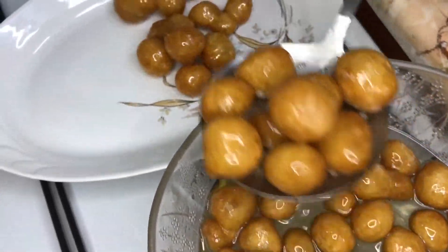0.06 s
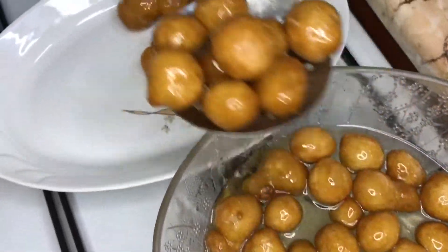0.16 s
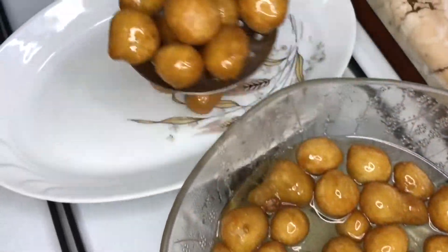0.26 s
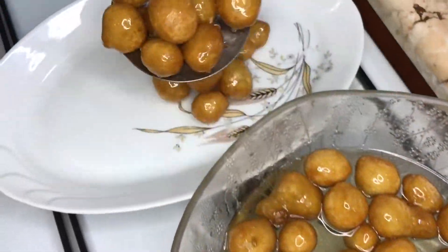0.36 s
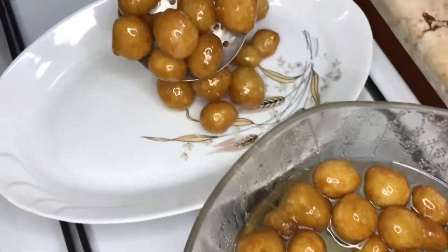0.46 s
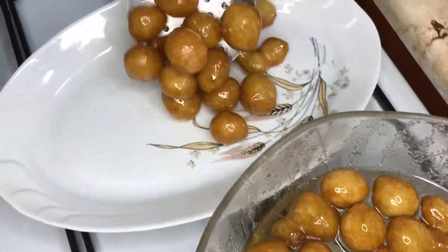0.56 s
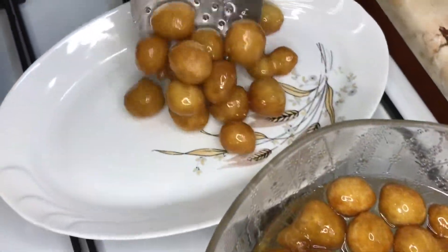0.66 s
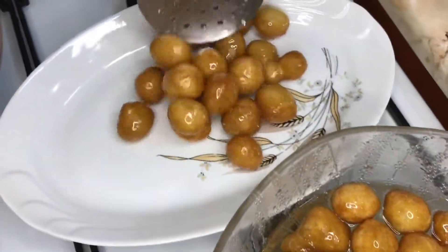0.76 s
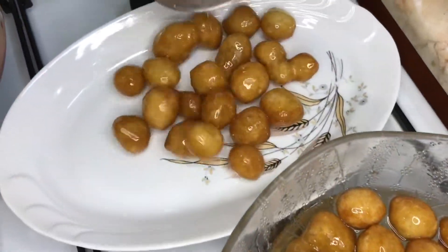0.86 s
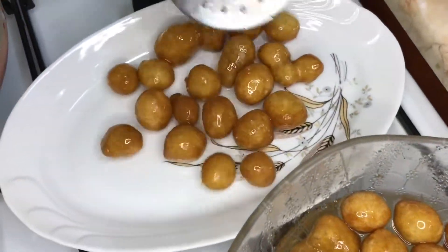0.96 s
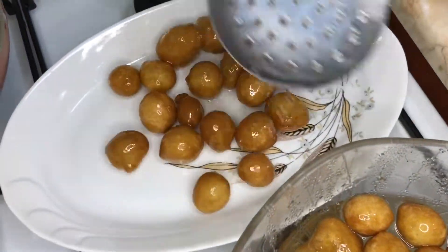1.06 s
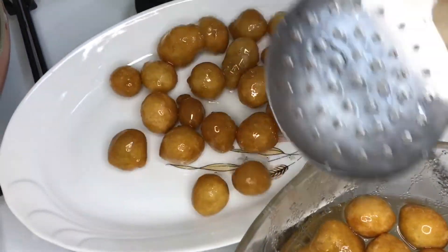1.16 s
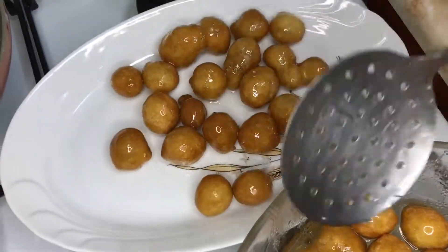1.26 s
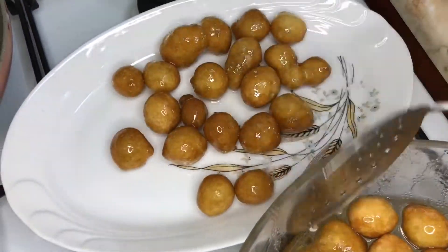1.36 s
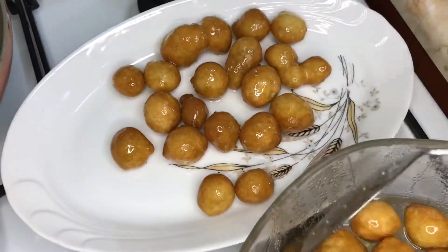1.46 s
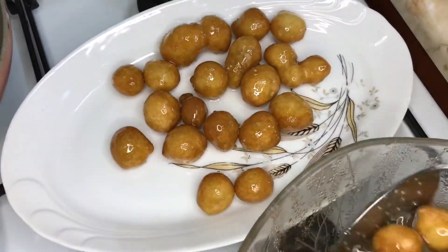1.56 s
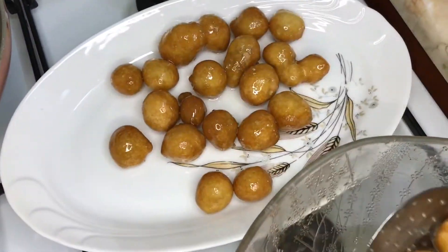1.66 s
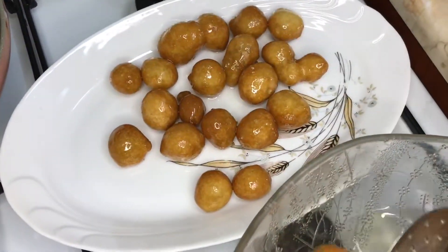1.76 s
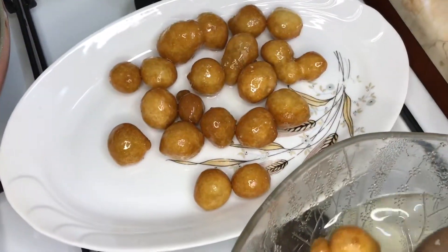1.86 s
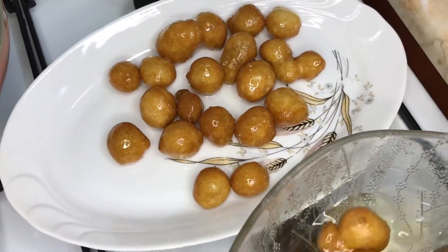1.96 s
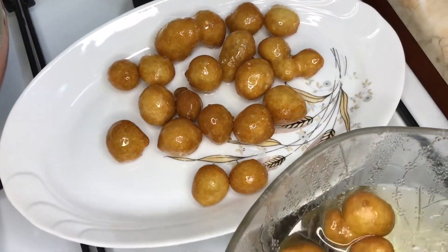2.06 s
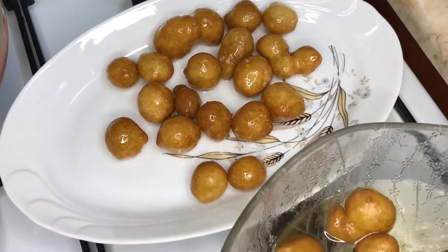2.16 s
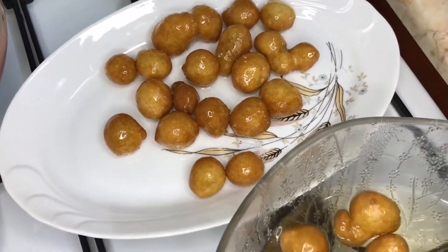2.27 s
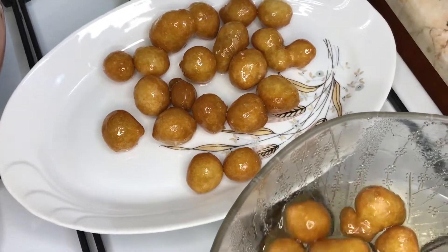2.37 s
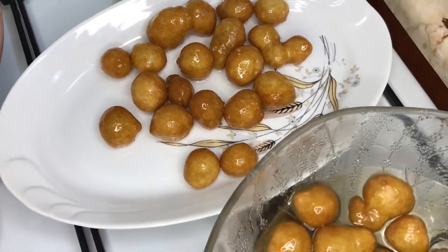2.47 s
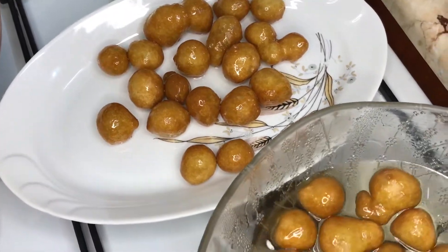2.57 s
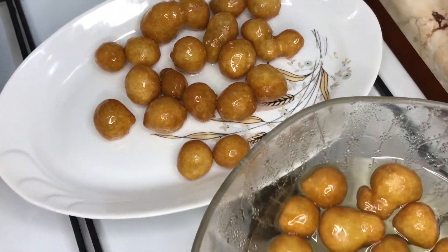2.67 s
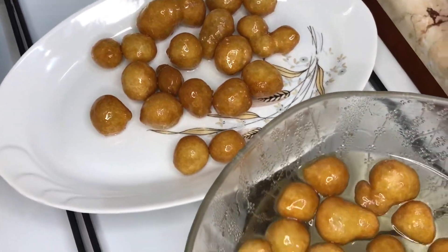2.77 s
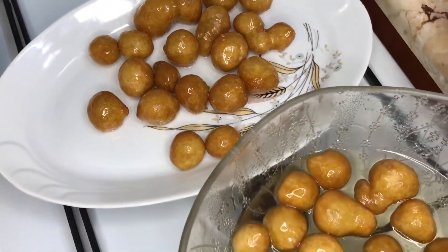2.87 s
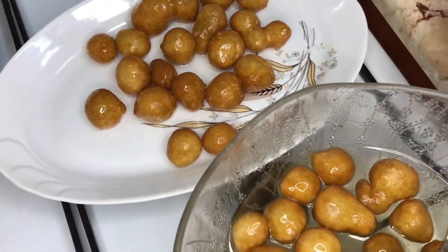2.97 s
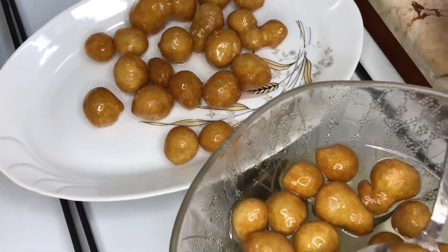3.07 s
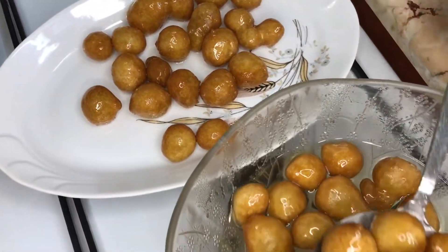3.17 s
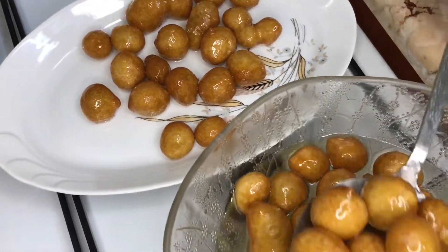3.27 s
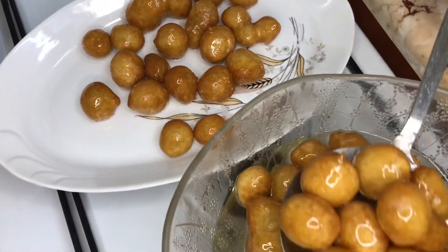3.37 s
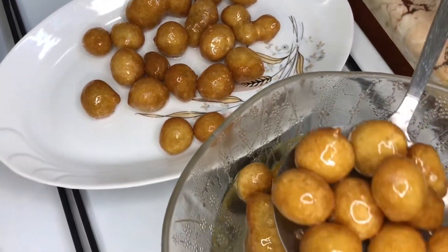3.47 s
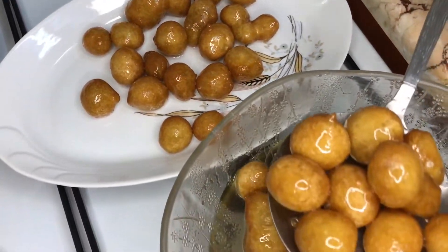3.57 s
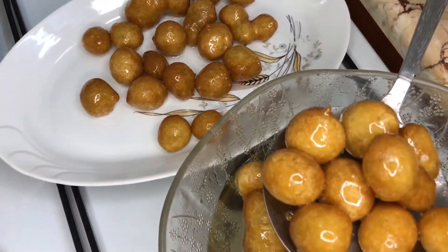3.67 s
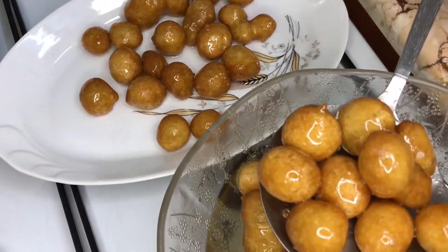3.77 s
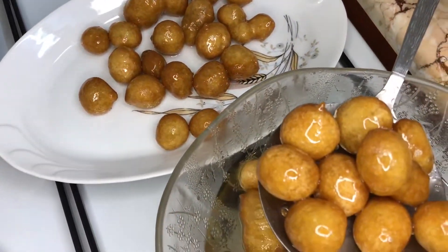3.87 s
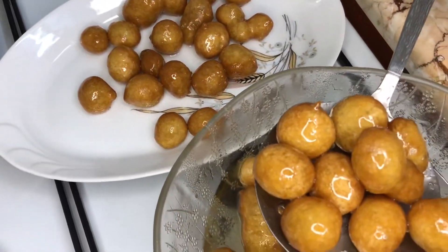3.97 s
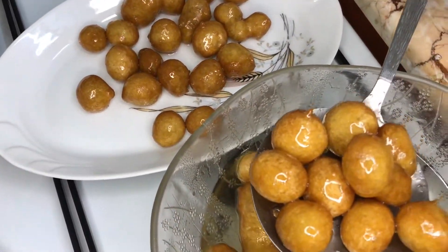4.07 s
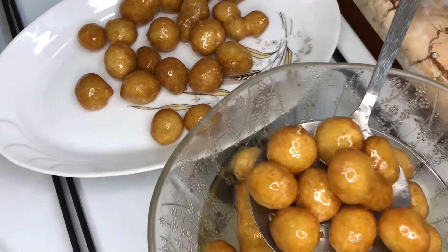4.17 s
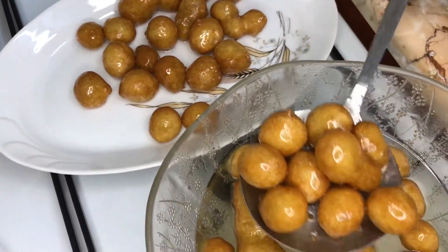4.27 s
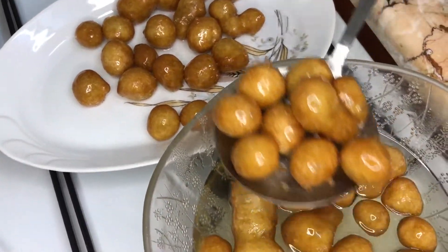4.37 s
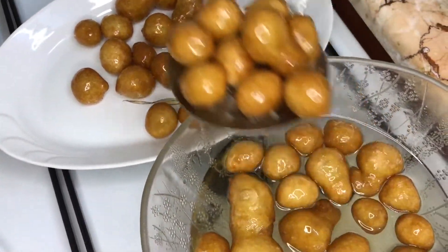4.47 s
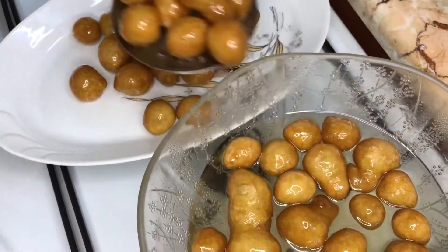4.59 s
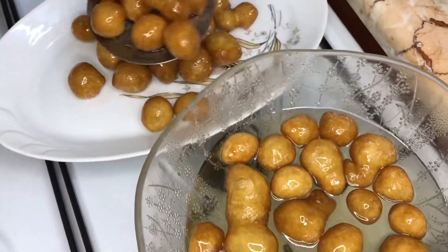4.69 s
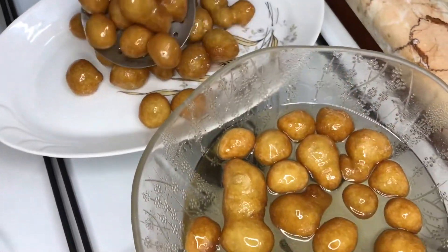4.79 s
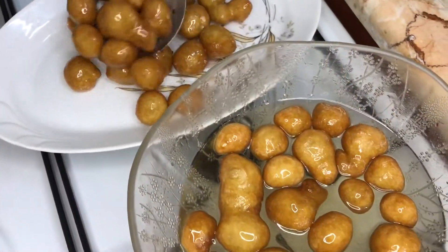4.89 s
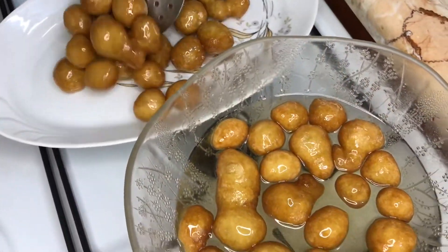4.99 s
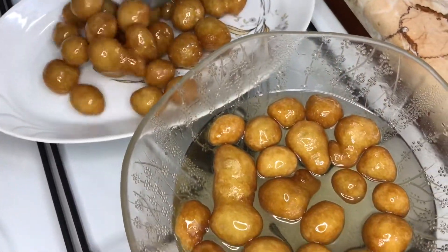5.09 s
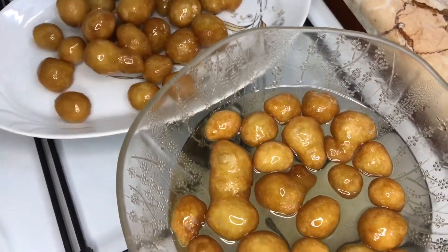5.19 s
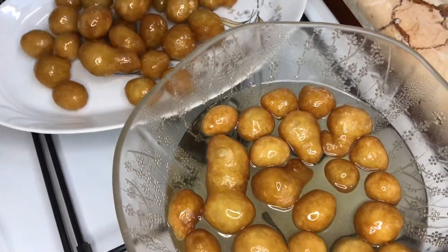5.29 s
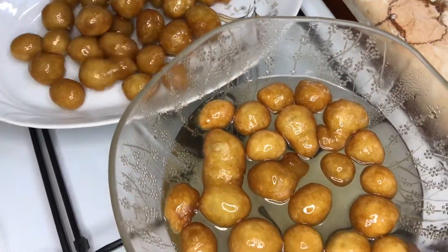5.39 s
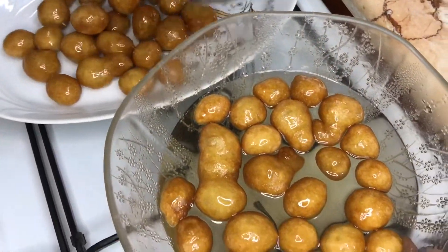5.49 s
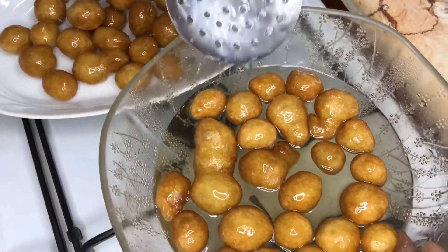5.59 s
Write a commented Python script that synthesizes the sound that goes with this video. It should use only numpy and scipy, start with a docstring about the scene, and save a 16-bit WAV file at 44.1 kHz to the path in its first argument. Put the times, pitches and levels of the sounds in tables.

```python
"""Dough balls, skimmer and plate

A steel skimmer lifts syrupy dough balls out of a glass bowl and tips them on a porcelain plate in a quiet kitchen.
Blows are decaying sines plus a noise crack; the scrape drives the bowl's resonances with dense random slips.
Rolling balls are uneven bumps through plate resonances; squeals and a low thud are narrow noise around a tone;
short bright ticks are sticky clicks or the treble of a knock. Under it lie a household rumble and a faint hiss."""
import sys
import numpy as np
from scipy import signal
from scipy.fft import rfft, irfft
from scipy.io import wavfile

SR = 44100
rng = np.random.default_rng(int(sys.argv[2]) if len(sys.argv) > 2 else 0)


def store_wav(level_fs):
    """Save 16-bit WAV to argv[1]."""
    pcm = np.round(np.clip(np.atleast_2d(level_fs), -1, 1) * 32767)
    wavfile.write(sys.argv[1], SR, pcm.T.astype(np.int16))


N = 248677   # length in samples


def from_db(db):
    """Decibels to an amplitude factor."""
    return 10 ** (np.asarray(db) / 20)


def rms_one(x):
    """Scale to an rms of 1."""
    return x / np.sqrt(np.mean(x ** 2) + 1e-20)


def in_time(rows):
    """Turn the columns of a timed table into curves; levels are silent outside the table."""
    s, *columns = np.transpose(rows)
    return [np.interp(np.arange(N) / SR, s, c, left=-200, right=-200) for c in columns]


def at_hz(points, hz):
    """Read a dB curve at given pitches, interpolating along log frequency."""
    points = np.array(points)
    return np.interp(np.log(hz), np.log(points[:, 0]), points[:, 1])


def favoured(hz, centre_hz, lift_db, octaves):
    """Lift in dB of the pitches near a centre."""
    return lift_db * np.exp(-(np.log2(hz / centre_hz) / octaves) ** 2)


def drift(per_s):
    """Slow random curve: normal knots of spread 1, joined by straight lines."""
    knots = rng.standard_normal(int(N / SR * per_s) + 2)
    return np.interp(np.arange(N) / SR * per_s, np.arange(len(knots)), knots)


def grit(per_s, spread_db):
    """Random clicks of uneven size and either sign; rms 1."""
    sizes = from_db(spread_db * np.minimum(rng.exponential(1, N), 4)) * rng.choice([-1, 1], N)
    return rms_one(sizes * (rng.random(N) < per_s / SR))


def coloured(source, points):
    """Give a flat source the spectrum of a table, dropping away past its last point; rms 1."""
    hz, db = np.transpose(points)
    grid = np.log(np.fft.rfftfreq(N, 1 / SR) + 1)
    shape = from_db(np.interp(grid, np.log(hz), db, right=-70))
    return rms_one(irfft(rfft(source) * shape, N))


def resonance(x, hz, width_hz):
    """Ring a source through a two-pole band; rms 1."""
    r = np.exp(-np.pi * width_hz / SR)
    return rms_one(signal.lfilter([1, 0, -1], [1, -2 * r * np.cos(2 * np.pi * hz / SR), r * r], x))


# Level of the low rumble over time. Each row: time in seconds, level in dB.
RUMBLE_LEVEL = [(0.0, -66.5), (0.55, -56), (2.42, -58.5), (2.73, -54), (2.76, -58.5), (4.41, -63),
                (4.48, -54), (4.52, -59), (4.88, -60), (4.98, -52), (5.12, -56), (5.17, -54), (5.37, -64.5),
                (5.64, -57)]
# Resonances of the rumble. Each row: centre in Hz, width in Hz, relative level in dB.
RUMBLE_PEAKS = [(55, 11, -0.6), (115, 30, -7.5)]


def rumble():
    """Household rumble: noise through low resonances, rising and falling in level."""
    low = rms_one(sum(from_db(db) * resonance(rng.standard_normal(N), hz, width_hz)
                      for hz, width_hz, db in RUMBLE_PEAKS))
    return from_db(in_time(RUMBLE_LEVEL)[0]) * low


# Spectrum of the hiss. Each row: frequency in Hz, relative density in dB per Hz.
HISS_SPECTRUM = [(59, -41), (124, 3.5), (156, -13), (214, -3.5), (245, -18.5), (340, -5.5), (390, -16),
                 (760, -11.5), (1240, -21.5), (2000, -23), (5100, -30.5), (9500, -33), (10500, -37.5),
                 (12500, -31.5), (15800, -36)]
# Narrow bands beside it. Each row: centre in Hz, width of each filter pass in Hz, relative level in dB.
AIR_BANDS = [(209, 22, -75), (270.2, 11, -80), (4060, 250, -84), (6750, 420, -82.5), (8600, 300, -95),
             (11460, 200, -88), (14720, 577, -86.5)]
# Slow swell. Each row: time in seconds, change of the hiss top in dB, change of the narrow bands in dB.
AIR_SWELL = [(0, 1, -2), (.6, -4, 1.5), (1.3, 0, 0), (3.1, -1.5, 1.5), (3.5, -0.5, -2), (3.9, 1.5, -1),
             (4.3, 0.5, -1.5), (4.7, 1, -2), (5.2, -0.5, -3.5), (5.64, -1, 1.5)]
HISS_DB = -65   # before the top swells


def air():
    """Broad hiss with a swelling top, and narrow noise bands that waver in level."""
    top_db, bands_db = in_time(AIR_SWELL)
    hiss = coloured(rng.standard_normal(N), HISS_SPECTRUM)
    top = signal.sosfilt(signal.butter(2, 8000, "high", fs=SR, output="sos"), hiss)
    hiss = hiss + (from_db(top_db) - 1) * top
    bands = 0
    for hz, width_hz, db in AIR_BANDS:
        band = resonance(resonance(rng.standard_normal(N), hz, width_hz), hz, width_hz)
        bands = bands + from_db(db + 1.5 * drift(4.3)) * band
    return from_db(HISS_DB) * hiss + from_db(bands_db) * bands


ROOM_DB, ROOM_T60_S, ROOM_CUT_HZ = -15, 0.15, 2400


def kitchen(x):
    """Dense, dulled reflections: decaying low-passed noise convolved with the dishes."""
    t = np.arange(SR // 2) / SR
    tail = rng.standard_normal(len(t)) * from_db(-60 * t / ROOM_T60_S) * (t > .004)
    tail = signal.lfilter([1], [1, -np.exp(-2 * np.pi * ROOM_CUT_HZ / SR)], tail)
    return from_db(ROOM_DB) * signal.fftconvolve(x, tail / np.sqrt(np.sum(tail ** 2)))[:N]


# Short bright ticks, some sticky clicks alone, some the treble of a knock.
# Each row: time in seconds, relative level in dB.
TICKS = [(0.1094, -54), (0.324, -49), (0.402, -57), (0.4788, -53), (0.521, -53), (0.654, -41.5),
         (0.6794, -51), (0.7302, -49), (0.754, -46), (0.9196, -48), (0.9627, -44), (1.228, -48),
         (1.7023, -50), (1.8975, -44), (3.0644, -54), (3.083, -45.5), (3.1447, -52), (3.206, -52),
         (3.282, -52), (3.668, -49.5), (3.7578, -42), (4.7358, -52), (5.043, -50), (5.102, -52),
         (5.3156, -56), (5.429, -45.5), (5.453, -45.5)]


def bright_ticks():
    """Sticky clicks and the treble of knocks: placed ticks over a random sprinkle, brief bright noise each."""
    clicks = from_db(-66) * np.abs(grit(10.0, 3.0)) / np.sqrt(SR / 10)   # the sprinkle
    for s, db in TICKS:
        clicks[round(s * SR)] = from_db(db - 7.5)
    envelope = signal.lfilter([1], [1, -np.exp(-1 / (0.0018 * SR))], clicks)   # 1.8 ms decay
    bright = signal.butter(3, [2500, 15500], "band", fs=SR, output="sos")
    return signal.sosfilt(bright, envelope * rng.standard_normal(N))


# Modes of the porcelain plate. Each row: pitch in Hz, relative level in dB, free 60 dB ring time in seconds.
PLATE = [(675.5, -6, .11), (747, 9, 0.03), (839, -2.5, 0.031), (1154, 2, 0.07), (1500, -11, 0.044),
         (1834, 2.5, 0.1), (1937, 11.5, 0.041), (2292, -2, 0.14), (2480, -2, 0.081), (3133, 5.5, 0.036),
         (3604, -0.5, 0.059), (4430, -15, 0.071), (4727, -4, 0.093), (4820, -62, 0.029), (5570, -22, 0.076)]
# Modes of the steel skimmer. Each row: pitch in Hz, relative level in dB, free 60 dB ring time in seconds.
SKIMMER = [(3476, -3.9, 0.068), (4450, -17, .09), (4636, -24, 0.047), (5330, -2, 0.04504),
           (6900, -26.5, 0.21), (7810, -40, .05)]
# Two spells of rolling balls. Each row: time in seconds, ringing level in dB, dull rumble level in dB.
ROLLS = [
    [(0.35, -77, -89), (0.512, -67, -66.5), (0.64, -71, -63), (0.668, -60, -56.5), (0.75, -65, -59.5),
     (0.852, -70, -54.5), (0.908, -60, -67), (0.968, -87, -54), (1.03, -67, -69.5), (1.206, -77, -81),
     (1.25, -81, -79.5)],
    [(4.8, -84, -77.5), (4.916, -71, -51), (5.038, -65, -64), (5.114, -52, -53), (5.14, -86, -52.5),
     (5.234, -83, -61), (5.33, -75.5, -62), (5.376, -78, -71.5), (5.472, -65.5, -54), (5.628, -78, -74),
     (5.635, -76, -71)],
]
ROLL_BRIGHT_DB = -15.5   # upper modes against the low ones


def rolling():
    """Sticky balls trundle over the glaze, ring plate and skimmer faintly and shake the table."""
    ring_db, rumble_db = np.max([in_time(spell) for spell in ROLLS], axis=0)
    bumps, noise = grit(400.0, 4.6), rng.standard_normal(N)
    low = rms_one(sum(from_db(db) * resonance(bumps, hz, 2.0 / t60) for hz, db, t60 in PLATE[:3]))
    bright = rms_one(sum(from_db(db) * resonance(bumps, hz, 9.0 / t60)
                         for hz, db, t60 in PLATE[3:] + SKIMMER[:1]))
    table = rms_one(resonance(noise, 201.6, 44) - 0.87 * resonance(noise, 270, 29)
                    + 0.5 * resonance(noise, 318, 130))
    return from_db(ring_db) * (low + from_db(ROLL_BRIGHT_DB) * bright) + from_db(rumble_db) * table


# Squeals of the edge, and one low thud near 740 Hz at 1.58 s. Each row: start in seconds, end in seconds,
# first pitch in Hz, last pitch in Hz, width in Hz (held to 70 at most), level in dB.
SQUEALS_AND_THUD = [(1.46, 1.538, 2470, 2470, 50, -51), (1.542, 1.606, 4820, 4530, 80, -47),
                    (1.399, 1.527, 5150, 4830, 50, -58), (1.578, 1.602, 735, 752, 60, -50),
                    (1.98, 2.088, 4150, 4270, 50, -59.5), (2.045, 2.11, 2650, 3010, 80, -47.5),
                    (2.014, 2.1, 2940, 3260, 60, -57), (2.09, 2.131, 5760, 5750, 80, -48),
                    (2.21, 2.237, 2823, 2880, 80, -51.5), (2.745, 2.857, 2250, 2367, 80, -57.5),
                    (2.80, 2.86, 4040, 4550, 80, -55), (2.864, 2.969, 2282, 2200, 60, -57.5)]


def squeals_and_thud():
    """Edge squeals and one low thud: narrow noise around a steady or gliding centre, swelling and fading."""
    out = np.zeros(N)
    for start, end, first_hz, last_hz, width_hz, db in SQUEALS_AND_THUD:
        at, n = round(start * SR), round((end - start) * SR)
        pole = np.exp(-np.pi * min(width_hz, 70) / SR)
        wobble = signal.lfilter([1], [1, -pole], rng.standard_normal(SR // 4))[-n:]
        tone = np.sin(2 * np.pi * np.cumsum(np.linspace(first_hz, last_hz, n)) / SR)
        out[at:at + n] += from_db(db) * rms_one(wobble * tone) * signal.windows.tukey(n, .5)
    return out


# Spectrum of the gritty rasp. Each row: frequency in Hz, relative density in dB per Hz.
RASP_SPECTRUM = [(880, -43.5), (1500, -13.5), (2480, -14.5), (2810, -15.5), (4830, -4), (5650, -12.5),
                 (11600, -3), (15700, -9)]
RASP_HZ = np.geomspace(1800, 15000, 40)   # centres of the flaring bands


def rasp(slips):
    """The contact patch has broad resonances that flare up and fade independently."""
    rough = coloured(slips, RASP_SPECTRUM)
    out = 0
    for k, hz in enumerate(RASP_HZ):
        b, a = signal.butter(1, [hz / 1.025, hz * 1.025], "band", fs=SR)
        out = out + from_db(4.0 * drift(30)) * signal.lfilter(b, a, rough) * (-1) ** k
    return rms_one(out)


# Sliding strokes of the edge along the glass; the last two lists are the bowl ringing on after a clink.
# Each row: time in seconds, then relative levels in dB of bumped low modes, ringing near 1.7 kHz and
# ringing near 4.5 kHz, favoured pitch in Hz, bright rasp in dB.
STROKES_AND_TAILS = [
    [(1.385, -66, -37, -41, 4380, -49), (1.391, -63, -68, -51, 4580, -56),
     (1.521, -56, -54, -55.5, 2540, -47), (1.549, -64, -60, -57, 4320, -46.5),
     (1.589, -47, -55, -43, 4370, -40), (1.605, -64, -63, -62, 4560, -52)],
    [(1.665, -60, -74, -68, 2990, -52), (1.671, -67, -80, -78, 3000, -72),
     (1.695, -75, -81, -83, 2430, -84), (1.701, -67.5, -81, -80, 2270, -62),
     (1.729, -51.5, -77, -74, 1910, -90), (1.76, -78, -86, -78, 2190, -84)],
    [(1.81, -68, -44, -56, 3580, -72), (1.844, -50, -48, -49, 3420, -73), (1.86, -59, -58, -61, 3040, -82),
     (1.874, -71, -63, -66, 2760, -77), (1.888, -81, -61, -68, 2390, -89), (1.9, -63, -56, -62, 2240, -75)],
    [(1.93, -47, -49, -48, 3170, -84), (1.948, -49, -52, -47, 2850, -73),
     (1.994, -61.5, -57, -64, 2950, -71), (2.046, -58, -52, -47.5, 3710, -62.5),
     (2.1, -43, -45.5, -47.5, 3330, -51), (2.135, -52, -41, -52, 3990, -51.5)],
    [(2.165, -65, -50, -57, 2190, -53), (2.193, -51, -61, -58, 2300, -74),
     (2.199, -52.5, -55, -51, 2540, -65), (2.237, -65, -54, -51, 3220, -80),
     (2.273, -63.5, -83, -68, 3020, -82), (2.295, -22, -39, -38, 2020, -73)],
    [(2.325, -56, -51, -49.5, 2770, -55), (2.429, -59.5, -65.5, -58, 3750, -62),
     (2.453, -59, -58, -52, 3740, -67), (2.491, -60, -57, -50.5, 4120, -73),
     (2.525, -75.5, -82, -69, 4030, -86.5), (2.55, -51, -36, -46, 3860, -60.5)],
    [(2.58, -49, -47, -45, 3150, -52), (2.604, -74, -63, -50.5, 3180, -62),
     (2.628, -50, -50, -68, 2560, -71), (2.648, -49, -66, -58.5, 1840, -74),
     (2.698, -79, -64, -68, 3180, -73), (2.715, -49, -54, -42, 3010, -56)],
    [(2.745, -52, -56, -47.5, 3060, -60), (2.797, -59.5, -61, -54.5, 2450, -71.5),
     (2.829, -61.5, -59, -53.5, 3680, -59), (2.945, -66, -61, -63.5, 2260, -88),
     (3.007, -66, -62, -63.5, 3330, -69), (3.02, -53, -68, -71, 2830, -81.5)],
    [(3.18, -48.5, -63, -76, 1316, -70), (3.196, -60, -72, -85, 1340, -82),
     (3.206, -65, -69, -91, 1280, -80), (3.24, -88, -56, -84, 1160, -91)],
    [(3.385, -64, -59.5, -78, 1180, -82), (3.397, -70, -68, -79, 1180, -93),
     (3.413, -71, -71, -89, 1180, -89), (3.435, -73, -84, -89, 1190, -93), (3.44, -74, -81, -78, 1210, -93)],
]
STROKE_EDGE_S = 0.009   # fade-in and fade-out time of each list


def strokes_and_tails():
    """Join strokes and ringing tails into four gains and the favoured pitch, each list fading in and out."""
    t, gains = np.arange(N) / SR, 0
    for s, *levels_db, _, rasp_db in map(np.transpose, STROKES_AND_TAILS):
        fade = np.clip(np.minimum(t - s[0] + STROKE_EDGE_S, s[-1] - t) / STROKE_EDGE_S, 0, 1)
        gains = gains + fade * from_db([np.interp(t, s, db) for db in (*levels_db, rasp_db)])
    rows = np.vstack(STROKES_AND_TAILS)
    rows = rows[np.argsort(rows[:, 0])]
    return *gains, np.interp(t, rows[:, 0], rows[:, 4])


# Modes of the glass bowl. Each row: pitch in Hz, relative level in dB, free 60 dB ring time in seconds.
BOWL = [(516, -10, 0.096), (684, 2, 0.09), (790, -3.5, .06), (1180, 3, 0.042), (1470, -7, 0.1),
        (1682, -6, 0.15), (1918, -8.5, 0.31), (1960, -1.5, 0.056), (2300, -2, 0.065), (2475, 1, 0.052),
        (2550, -9, .08), (2830, -15, .15), (2975, -0.5, 0.12), (3120, -15, 0.28), (3240, -14, 0.15),
        (3740, -8.5, .1), (4026, 0.5, .12), (5050, -13, .1), (5300, 1, 0.24), (5980, -3, .08),
        (6060, -14.5, .05), (6830, -3, 0.11), (8000, -5.5, .05), (8280, -0.5, 0.09), (10200, -10.5, 0.044),
        (9440, -13.5, .04), (11020, -17, .05), (12150, -11, .05), (13610, -12.5, .04), (14800, -10, .03)]
# How readily the bowl answers a sliding edge. Each row: frequency in Hz, lift in dB.
SLIDE_ANSWER = [(1200, -4), (1500, -1.5), (1950, 2), (2400, -3), (3000, 1), (4050, 1.5), (5300, 0),
                (6000, -2.5), (6800, -2.5), (8200, -9.5)]
# Centres of the lower and upper ringing, in Hz.
SLIDE_ZONES_HZ = [1700, 4500]
SLIDE_FAVOUR_DB, SLIDE_FAVOUR_OCTAVES = 7.5, 0.11


def scrape_and_tails():
    """Dense slips keep the bowl's modes sounding, in strokes and ringing tails, over a gritty rasp."""
    bump, low_ring, high_ring, rough, spot_hz = strokes_and_tails()
    slips, bumps = grit(2500.0, 2.2), grit(120.0, 2.3)
    out = rough * from_db(-1.5 + 2.5 * drift(60)) * rasp(slips)
    for hz, db, t60 in BOWL[1:24]:
        width_hz = 2.1 * np.log(1000) / np.pi / t60      # the contact damps the mode
        if hz < 900:      # pushed balls bump the lowest modes now and then
            out += bump * from_db(db - 7.5 + 2.8 * drift(25)) * resonance(bumps, hz, width_hz)
        else:
            lift_db = at_hz(SLIDE_ANSWER, hz) + favoured(hz, spot_hz, SLIDE_FAVOUR_DB, SLIDE_FAVOUR_OCTAVES)
            high = at_hz(np.c_[SLIDE_ZONES_HZ, [0, 1]], hz)
            ring = low_ring ** (1 - high) * high_ring ** high      # crossfade in dB
            level = from_db(db - 12.0 + lift_db + 5.4 * drift(24.99))
            out += ring * level * resonance(slips, hz, width_hz)
    return out


def rings(modes, gains_db, share, t):
    """Decaying sines; every blow lands elsewhere, so strengths and pitches scatter a little."""
    hz, db, t60 = np.transpose(modes)[:, :, None]
    louder_db, higher = rng.normal(0, [[[1.5]], [[.002]]], (2, *hz.shape))
    decay = from_db(db + gains_db + louder_db - 60 * t / (t60 * share))
    return np.sum(decay * np.sin(2 * np.pi * hz * (1 + higher) * t), axis=0)


# Centres of the bands in which a blow cracks, in Hz.
CRACK_BANDS_HZ = [500, 750, 1170, 1500, 1950, 2400, 3000, 4050, 5300, 6100, 6800, 8200, 10000, 13000]
FAVOUR_OCTAVES = .14   # the spot that is hit lifts the modes around two pitches


def blows(events, body, zones_hz, answer, body_db, skimmer_gain_db, crack_db, snap_t60, tail_db, tail_t60):
    """Each blow rings body and skimmer and cracks, a noise snap plus a weaker tail, all in its own colour."""
    out, t = np.zeros(N + SR), np.arange(SR // 4) / SR
    regions = np.array([hz for hz in CRACK_BANDS_HZ if hz <= answer[-1][0] * 1.1])
    pitches = np.array(body)[:, :1]
    bands = [signal.butter(2, [hz / 1.15, hz * 1.15], "band", fs=SR, output="sos") for hz in regions]
    dying = from_db(-60 * t / snap_t60) + from_db(tail_db - 60 * t / tail_t60)
    for s, peak_db, *zones_db, lower_hz, lower_db, upper_hz, upper_db, skimmer_db, share, contact_ms in events:
        rise = 1 - np.exp(-1000 * t / max(contact_ms, .05))      # the force builds over the contact time
        share = np.clip(share, .2, 3)

        def spot_lift(hz):
            return (at_hz(np.c_[zones_hz, zones_db], hz) + at_hz(answer, hz)
                    + favoured(hz, lower_hz, lower_db, FAVOUR_OCTAVES)
                    + favoured(hz, upper_hz, upper_db, FAVOUR_OCTAVES))

        gains, colour = spot_lift(pitches), spot_lift(regions)
        burst = rng.standard_normal(len(t)) * dying + 1e-18
        crack = sum(from_db(db - max(colour)) * signal.sosfilt(band, burst) for band, db in zip(bands, colour))
        sound = rings(body, gains + body_db, share, t)
        sound = sound + rings(SKIMMER, skimmer_db + skimmer_gain_db, share, t)
        sound = sound + from_db(peak_db + crack_db) * crack
        at = round(s * SR)
        out[at:at + len(t)] += rise * sound
    return out[:N]


# Balls and skimmer on the plate. Each row: start in seconds, relative levels in dB of the crack and of the low,
# middle and high modes, lower favoured pitch in Hz, its lift in dB, upper favoured pitch in Hz, its lift in dB,
# skimmer ring in relative dB, share of the free ring time (held to 0.2 at least), contact time constant in ms.
KNOCKS = [(0.547, -45, -45.5, -56.5, -63, 690, 9.4, 1830, 12, -72, 0.53, 1.5),
          (0.656, -29, -37.5, -44.5, -63, 732, 8.5, 1850, 12.2, -54.5, 0.62, 1),
          (0.706, -42, -48.5, -57, -66, 668, 9.9, 3160, 10, -72, 0.7, 1.8),
          (0.729, -48, -54, -57, -54, 668, 9, 2260, 11, -58, 0.4, 1.8),
          (0.75, -33, -40.5, -53, -57, 697, 9, 1920, 11.4, -67, 0.81, 2.3),
          (0.758, -36, -42, -46, -64, 690, 9.7, 1880, 11, -66, 0.64, 2.1),
          (0.781, -34, -45, -65, -56, 754, 9, 1090, 12, -69, 0.4, 1.8),
          (0.8, -29.5, -38, -47.5, -50.5, 660, 15.5, 1900, 9.5, -70, 0.51, 1.5),
          (0.907, -40, -50, -59, -54, 686, 9, 1820, 11, -63, 0.95, 2.9),
          (0.922, -26, -37, -41, -51, 700, 9, 1800, 11.6, -65, 0.4, 1.1),
          (0.964, -11.5, -31, -57, -61.5, 684, 7.8, 1060, 11, -64, 0.76, 2.8),
          (0.995, -43, -53, -67, -77, 611, 9, 1860, 12, -79, 0.65, 2.3),
          (1.228, -35, -48.5, -45.5, -63, 700, 12, 1180, 14, -67, 0.52, 1.8),
          (4.866, -41, -39.5, -40, -55.5, 778, 9, 1150, 14, -60, 0.51, 1.65),
          (4.876, -40, -38, -51, -72, 640, 13, 1160, 14.6, -68, 0.94, 1.9),
          (4.903, -42, -42.5, -46.5, -66, 743, 8, 1140, 17, -66, 0.84, 1.7),
          (4.926, -32, -39.5, -50, -70, 697, 9.3, 1140, 11, -68, 1, 1.35),
          (4.946, -39, -39, -62, -57, 899, 9, 1040, 12, -74, 0.46, 1.4),
          (4.998, -44, -48, -65, -63, 616, 9, 1950, 11, -77, 0.73, 1.6),
          (5.043, -22, -34.5, -56, -54, 729, 7.7, 1840, 14, -70.5, 0.32, 2.2),
          (5.059, -29, -27, -35, -48.5, 732, 8.3, 995, 12, -53, 0.5, 0.97),
          (5.075, -40, -52, -73, -73, 641, 9, 1140, 12, -74, 0.44, 1.4),
          (5.1, -35, -36, -55, -57, 729, 8.7, 1840, 12, -72, 0.6, 1.6),
          (5.134, -35, -44.5, -75, -78, 685, 9, 1000, 12, -86, 0.76, 1.6),
          (5.182, -32, -39, -44.5, -54, 740, 8.6, 990, 12, -71, 0.46, 1.5),
          (5.304, -51, -50.5, -73, -68, 654, 9, 1030, 12, -79, 0.54, 1.6),
          (5.429, -40, -35, -43, -44, 782, 9.8, 1000, 12, -58, 0.6, 1.9),
          (5.44, -15.5, -33.5, -72, -65, 654, 11, 1090, 11, -67, 0.74, 1.9),
          (5.458, -27, -39.5, -68, -61, 641, 9.4, 1070, 11, -66, 1, 2.3)]
# Where the plate's low, middle and high modes lie, in Hz.
PLATE_ZONES_HZ = [750, 1800, 4200]
# How readily the plate answers a blow. Each row: frequency in Hz, lift in dB.
PLATE_ANSWER = [(500, -11.5), (750, 0), (1170, -8), (1500, -24), (1950, -6), (2400, -2.5), (3000, 1),
                (4050, 2.5), (5300, -7), (6100, -8)]


def plate_knocks():
    """Balls and skimmer knock on porcelain: plate and skimmer modes with a cracking onset."""
    return blows(KNOCKS, PLATE, PLATE_ZONES_HZ, PLATE_ANSWER, body_db=-4, skimmer_gain_db=7.0, crack_db=1.0,
                 snap_t60=0.029, tail_db=-11.5, tail_t60=0.02)


# Skimmer on the bowl. Each row: start in seconds, relative levels in dB of the crack and of the modes in five
# octaves from low to high, lower favoured pitch in Hz, its lift in dB, upper favoured pitch in Hz, its lift in dB,
# skimmer ring in relative dB, share of the free ring time (held to 0.2 at least), contact time constant in ms.
CLINKS = [(1.354, -17, -38, -32, -27, -24, -29.5, 2596, 14.6, 3430, 7.2, -17, 1, 0.51),
          (1.419, -32, -51, -46, -44, -34, -37, 2520, 15.3, 3500, 8, -37.5, 1, 0.22),
          (1.463, -31, -46, -64, -46, -47, -56, 2470, 12, 3080, 8, -55, 0.32, 0.15),
          (1.525, -28, -42, -44.5, -48, -50, -46, 2510, 13, 4990, 8, -56, 0.54, 0.19),
          (1.61, -34.5, -53.5, -49, -50, -51, -46, 2330, 13, 4460, 7.3, -65, 0.19, 0.17),
          (1.633, -36, -54, -49, -41, -54, -66, 1770, 14, 3340, 8, -62, 0.17, 0.17),
          (1.649, -32, -45.5, -58, -46, -40, -46, 2380, 15.7, 3850, 6.5, -64, 0.19, 0.27),
          (1.785, -17.5, -41.5, -34.5, -23.5, -32, -39.5, 1480, 7.5, 5350, 8.3, -39.5, 0.76, 0.51),
          (1.91, -30, -43, -44, -39, -42.5, -65, 1490, 10.5, 3000, 5.3, -61, 0.91, 0.36),
          (1.935, -29.5, -62, -47.5, -32.5, -42.5, -80, 1480, 11.3, 5950, 9, -53, 0.91, 0.23),
          (1.949, -42, -57, -34, -44, -39, -70, 2570, 14, 4100, 6, -64, 0.58, 0.26),
          (2.098, -31, -48, -52, -46, -42, -49.5, 2450, 11, 3000, 9.8, -56, 0.94, 0.29),
          (2.141, -18.5, -47, -41.5, -28.5, -32.5, -37, 1914, 12.5, 5600, 8.7, -39, 0.35, 0.17),
          (2.199, -33, -48, -51, -49.5, -46, -47.5, 2660, 12, 2930, 8, -66, 0.26, 0.17),
          (2.303, -18, -44, -36, -28, -25, -29.5, 2280, 9.7, 6150, 4.6, -37, 0.32, 0.13),
          (2.558, -10.5, -36, -32, -24, -23, -27.5, 2240, 8.1, 3050, 7.1, -40, 0.65, 0.24),
          (2.623, -40.5, -37.5, -59, -46, -64, -68.5, 1220, 12, 2940, 8, -72, 1, 0.17),
          (2.721, -17.5, -38, -35, -31, -31, -34, 2275, 11, 6020, 6.1, -50, 0.27, 0.39),
          (2.833, -30, -59, -63, -38, -45.5, -51, 2270, 13, 4560, 6.4, -49, 0.53, 0.17),
          (2.998, -37.5, -57.5, -55.5, -51, -57, -60, 1900, 13, 3080, 7.7, -51, 0.6, 0.17),
          (3.164, -45, -51.5, -46, -41.5, -70.5, -60, 1910, 12, 3040, 8, -76, 0.24, 0.15),
          (3.344, -34, -49, -66, -60.5, -65, -64.5, 2360, 13.3, 3690, 6.2, -74, 0.43, 0.14),
          (3.371, -35.5, -44, -53, -67, -58, -62, 1170, 10.5, 4100, 8, -79, 0.29, 0.13)]
# Where the bowl's five octaves of modes lie, in Hz.
BOWL_ZONES_HZ = [700, 1500, 3000, 6000, 11000]
# How readily the bowl answers a blow. Each row: frequency in Hz, lift in dB.
BOWL_ANSWER = [(500, 0.5), (750, 5), (1200, 0.5), (1500, 2.5), (2000, -8), (3000, -4.5), (4050, -1),
               (5300, -9.5), (6100, -8.5), (6800, -2.5), (8200, -1), (13000, -3.5)]


def bowl_clinks():
    """The skimmer clinks on glass: bowl and skimmer modes with a cracking onset."""
    return blows(CLINKS, BOWL, BOWL_ZONES_HZ, BOWL_ANSWER, body_db=-6.5, skimmer_gain_db=3.0, crack_db=2.5,
                 snap_t60=0.025, tail_db=-13.5, tail_t60=0.057)


def scene():
    """Dishes, their room and the background."""
    dishes = bowl_clinks() + plate_knocks() + bright_ticks() + scrape_and_tails() + squeals_and_thud() + rolling()
    return (dishes + kitchen(dishes) + rumble() + air())[None, :]


CUTOFF_HZ = 17150   # start of the low-pass stop band


def record(dry):
    """The deepest bass and the top are cut."""
    dry = signal.sosfilt(signal.butter(2, 38, "high", fs=SR, output="sos"), dry)
    return signal.sosfilt(signal.cheby2(16, 70, CUTOFF_HZ, fs=SR, output="sos"), dry)


dry = scene()
out = record(dry)
store_wav(out)
```